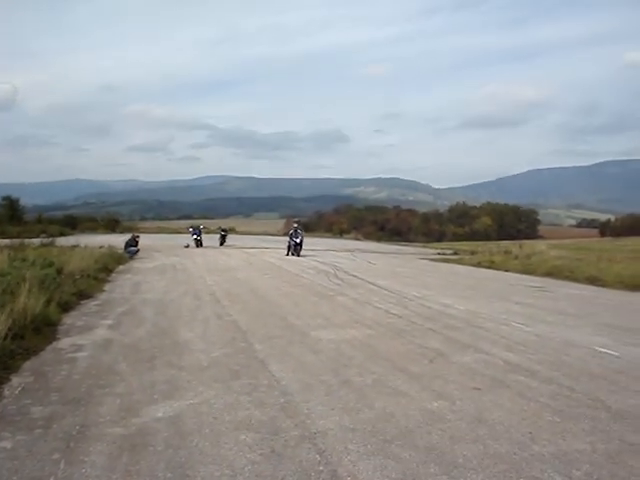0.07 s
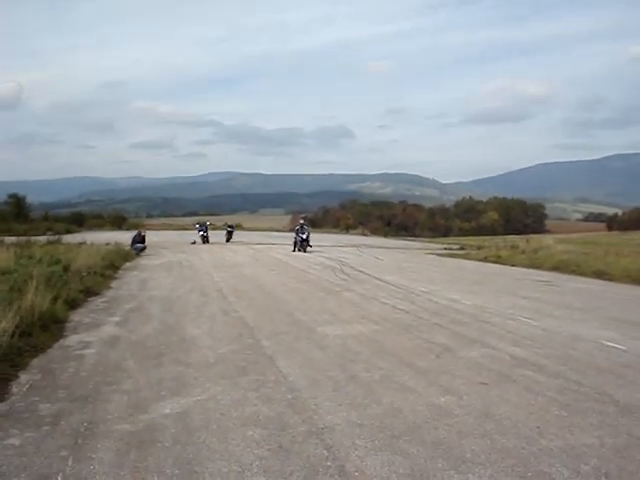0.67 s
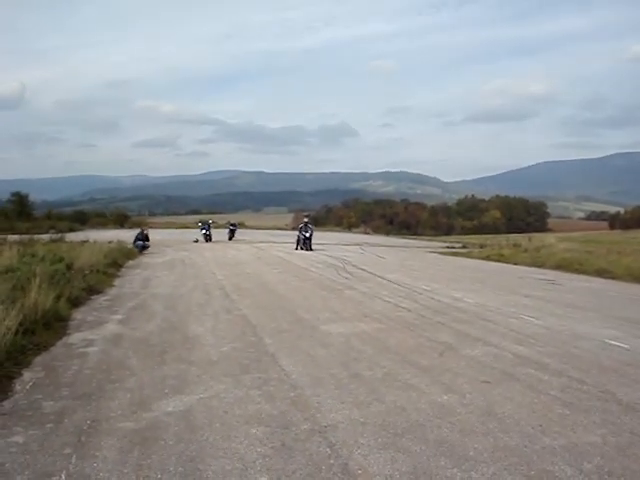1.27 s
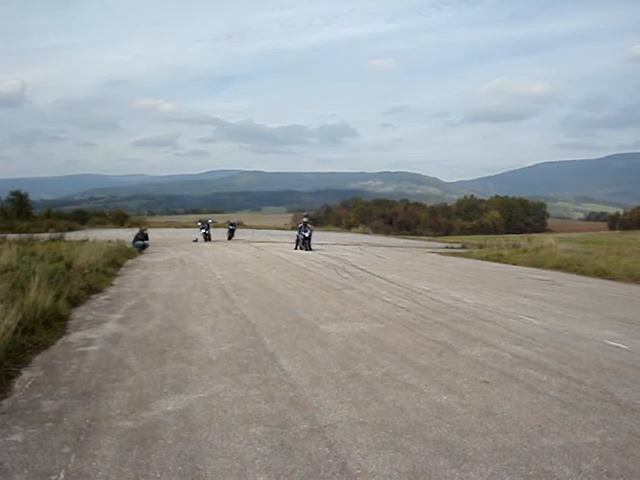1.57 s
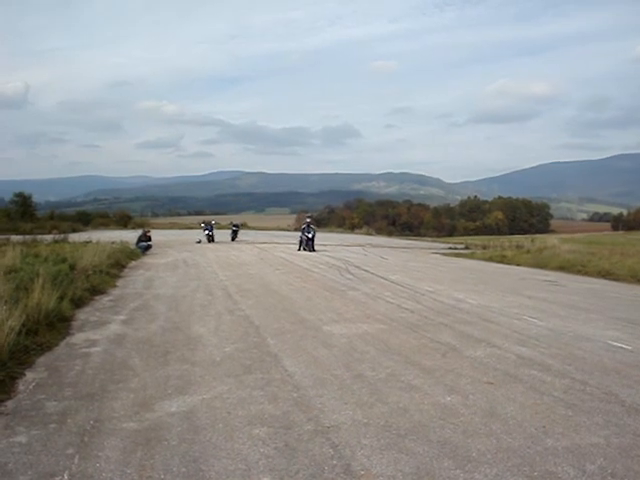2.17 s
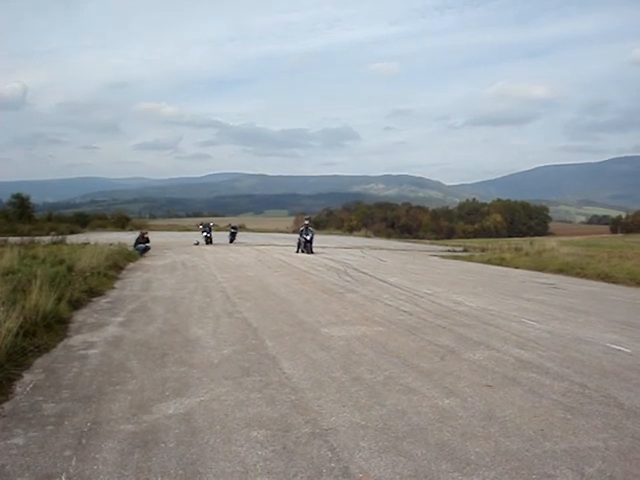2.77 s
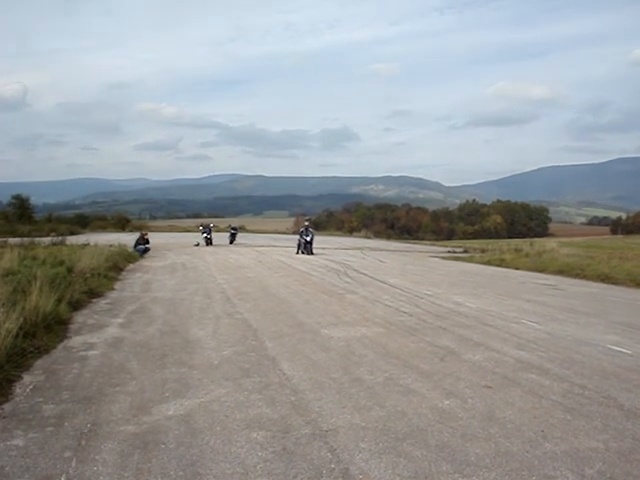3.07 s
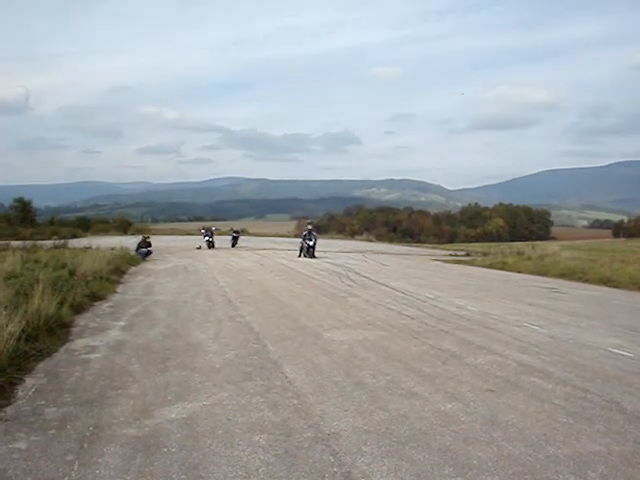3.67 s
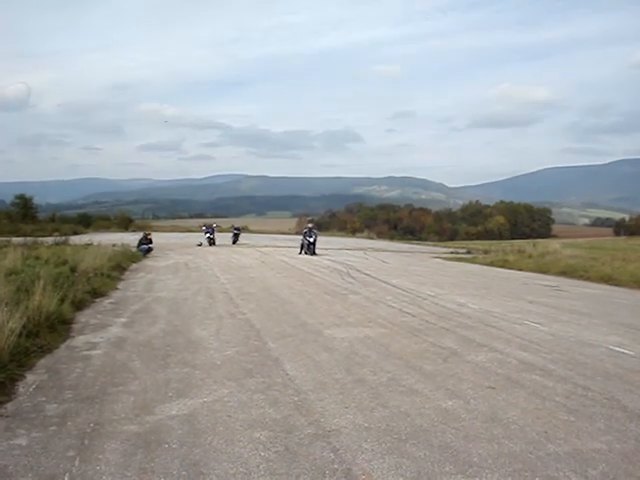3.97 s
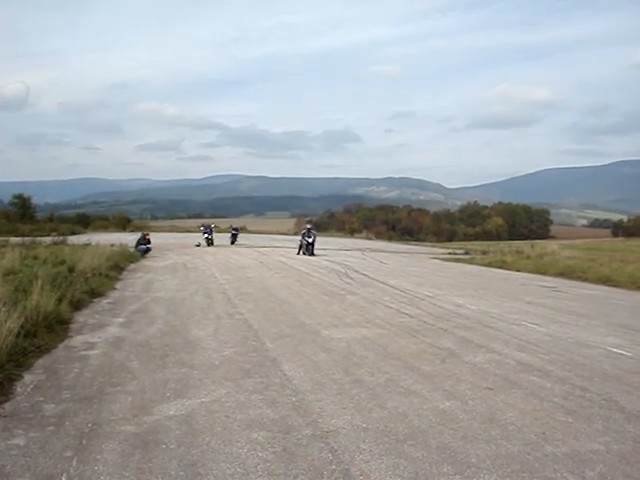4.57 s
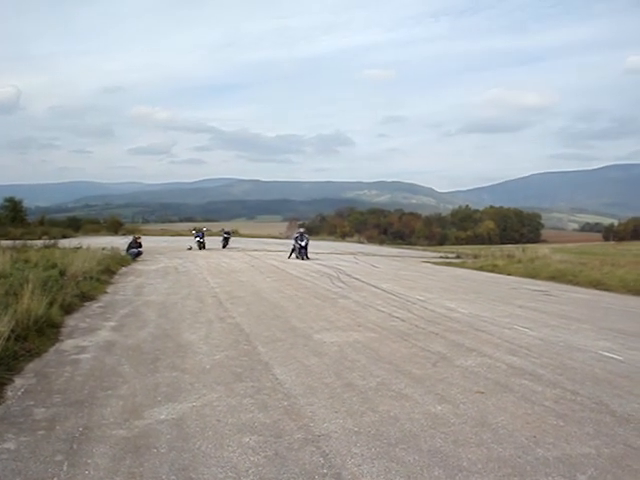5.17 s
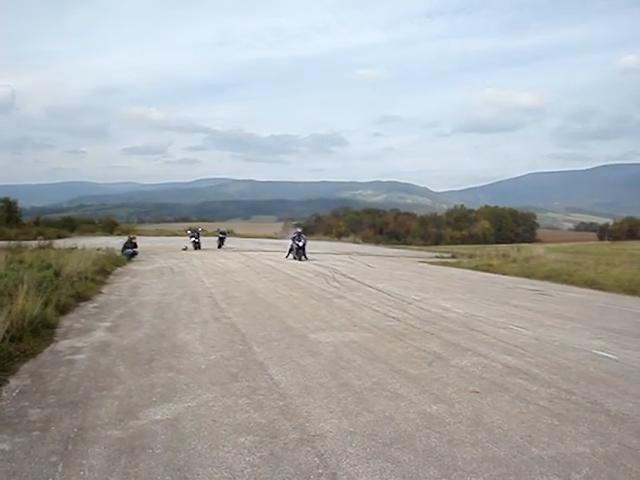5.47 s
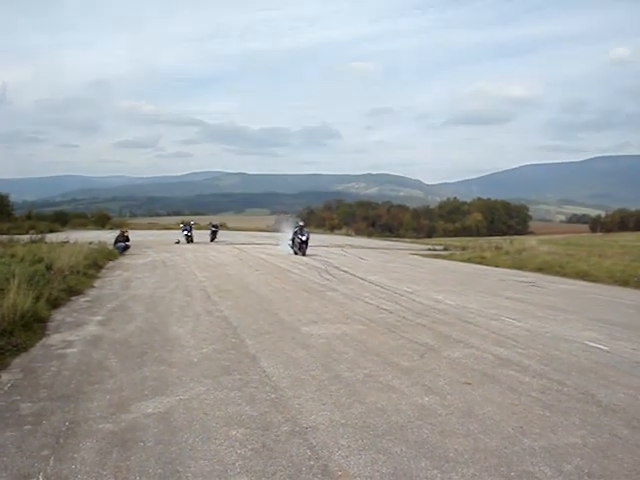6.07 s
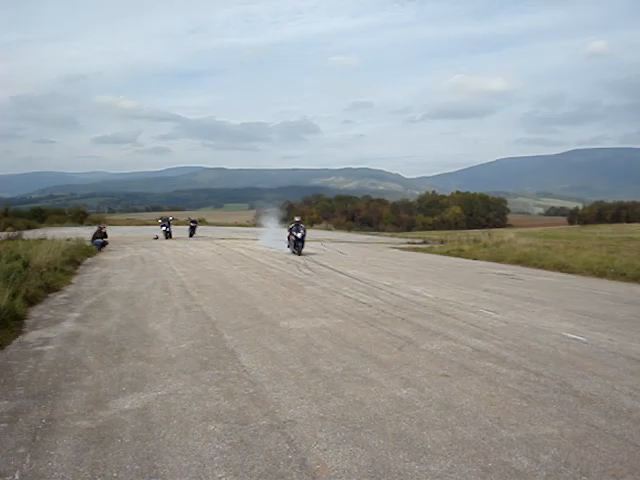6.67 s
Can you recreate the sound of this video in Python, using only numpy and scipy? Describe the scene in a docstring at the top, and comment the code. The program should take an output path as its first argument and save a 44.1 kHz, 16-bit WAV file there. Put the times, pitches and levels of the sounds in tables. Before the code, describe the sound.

A four-cylinder motorcycle idles faintly and unevenly some way down an open airstrip, with a few small rattles. It coughs, picks up speed and gives three quick, loud throttle blips. The engine then climbs to high revs and holds a raspy, wavering drone, rising again at the end. Light wind lies underneath, and a small microphone flattens the loudest peaks.

```python
"""A four-cylinder motorcycle some way down an open airstrip idles lumpily with faint rattles.
From 1.8 s it coughs and picks up, from 2.7 s it is blipped three times, and from 3.6 s it holds
high revs against its spinning rear tyre. Each firing rings the exhaust and lets out a puff of gas.
Light wind lies under it all; a small microphone flattens the loudest peaks."""
import sys
import numpy as np
from scipy import signal
from scipy.fft import rfft, irfft
from scipy.io import wavfile
from scipy.ndimage import uniform_filter1d

SR = 44100
rng = np.random.default_rng(int(sys.argv[2]) if len(sys.argv) > 2 else 0)


def waveform_to_disk(signal):
    """Save audio, clipped to [-1, 1], as 16-bit WAV at the path in sys.argv[1]."""
    frames = np.transpose(np.atleast_2d(signal))
    scaled = np.clip(frames, -1, 1) * 32767
    samples = np.round(scaled).astype(np.int16)
    wavfile.write(sys.argv[1], SR, samples)


N = 305172
T = np.arange(N) / SR

# cool silencer colour: f/Hz, level/dB
COOL_COLOUR = [(35, -59.5), (60, -14.5), (151, -15), (199, -4.5), (236, -10), (489, -7), (593, -6.5),
               (689, -1.5), (1200, -3.5), (1690, -28.5), (2190, -22.5), (2890, -51.5), (10000, -66),
               (13000, -103.5), (22000, -120)]
# cool pipe resonances: f/Hz, width/Hz, lift/dB
COOL_RESONANCES = [(211, 35, 9.5), (339, 110, 12.5), (589.5, 61, 15), (810, 110, 0.5), (1120, 570, 4),
                   (2680, 100, 0.5)]
# engine picks up, hesitates, catches: t/s, crank/Hz, level/dB
RUN_UP = [(1.8, 21.01, -39.5), (1.92, 30.67, -21.5), (2.06, 36.6, -21), (2.17, 34.44, -26.5),
          (2.3, 34.7, -22.5), (2.35, 37.06, -15), (2.47, 58.56, -7), (2.53, 63.2, -15),
          (2.66, 66.37, -14.5)]
# blips: opens/s, opening time/s, shuts/s, target crank/Hz, extra level/dB, extra rasp/dB
THROTTLE_BLIPS = [(2.67, .015, 2.77, 108, 2.5, 2), (3.025, .015, 3.115, 104, 0, 1),
                  (3.415, .05, 3.495, 89, 1, 2)]

SHUTTING_S = 0.034  # exhaust dies down after the throttle shuts
COOL_ROUGH, HOT_ROUGH, SHUT_ROUGH, LUG_ROUGH = .32, .1, .42, .2


def revving():
    """Firings and gas ring a pipe whose voice follows heat and throttle; moving air makes it waver."""
    # silencer colour, hot and throttle shut: f/Hz, level/dB
    hot_colour = [(60, -56.5), (130, -36.5), (225, 3), (350, 4), (470, 1), (620, -2.5), (1070, 1),
                  (1400, -10.5), (1700, -22), (2500, -24.5), (2850, -43.5), (4000, -43.5), (5000, -57),
                  (10000, -59.5)]
    shut_colour = [(47, -66), (80, -37), (125, -26), (183, 1), (229, -2.5), (357, -2), (428, -1.5),
                   (556, -10), (1040, -0.5), (1690, -16.5), (2200, -17), (2980, -45.5), (3870, -39),
                   (10000, -76.5), (13000, -109), (22000, -120)]
    # pipe resonances, likewise: f/Hz, width/Hz, lift/dB
    hot_modes = [(481.4, 50, 5.5), (639.5, 104, 8), (820, 30, -7.5), (920.4, 110, 7), (1078, 184, 9),
                 (1424.4, 70.4, 11), (1586, 40, 8.5), (2234, 85, 3.5), (2587, 150, 9.5), (2830, 160, -11.5),
                 (3825, 660, 7.5), (6600, 600, -1)]
    shut_modes = [(210, 110, -4.5), (414, 72, -8.5), (1090, 130, 0.5), (2635, 190, 14.5), (3100, 150, -1),
                  (4060, 530, 5.5)]
    crank_hz, opened = crank_speed(), throttle()
    heat = np.interp(T, [RUN_UP[-1][0], THROTTLE_BLIPS[0][2], 3.66, 3.84], [0, .069, .069, 1])
    shares = opened * (1 - heat), opened * heat, 1 - opened
    db, boom_db, rasp_db, gas_db, rough = engine_load(crank_hz, *shares)
    pulses = firings(crank_hz, rough)
    gas = undb(gas_db) * band(puffs(pulses, decay_s=.008), 600, 11000, order=2)
    # ragged burning at low revs
    burble = undb(2 * gas_db - 2) * band(puffs(pulses, decay_s=.012), 90, 600, order=2)
    spit = undb(-3) * band(puffs(pulses, decay_s=.0014), 3100, 11000)
    flow = pulses + gas + burble + spit
    voices = [(COOL_COLOUR, COOL_RESONANCES), (hot_colour, hot_modes), (shut_colour, shut_modes)]
    pipe = sum(share * steady(excite(flow, response(*voice))) for share, voice in zip(shares, voices))
    pipe = pipe + far_paths(pipe)
    boom = steady(band(pipe, 55, 510)) * undb(boom_db)
    bark = steady(band(pipe, 500, 1550)) * undb(.6 + .5 * wander(14))
    rasp = steady(band(pipe, 1552, 7500)) * undb(rasp_db + .69 * wander(20))
    return ramp(T, 1.76, 1.81) * undb(db) * steady(boom + bark + rasp)


def firings(crank_hz, roughness):
    """Two pulses a turn; unequal cylinders put lines between the firing harmonics."""
    # cylinders in firing order: relative strength/dB, header delay/ms; both scaled by imbalance
    cylinders = [(2.04, 0.25), (-0.4, 0.047), (0.64, .11), (0.7, 0.006)]
    fired = np.cumsum(2 * crank_hz) / SR
    count = np.arange(1, int(fired[-1]))
    t_s = np.interp(count, fired, T)
    rough = np.interp(t_s, T, roughness)
    imbalance = 1 + 1.64 * (rough - HOT_ROUGH)
    strength_db, header_ms = np.array(cylinders)[count % len(cylinders)].T * imbalance
    time_scatter, size_scatter = rng.standard_normal((len(t_s), 2)).T
    late_ms = header_ms + .13 * rough * time_scatter
    size_db = strength_db + 4 * rough * size_scatter
    return clicks(t_s + late_ms / 1000, undb(size_db))


def crank_speed(coast_hz_per_s=112):
    """Turns per second: blips wind the crank up, friction slows it, the clutch drags it into burnout."""
    # speed against the spinning tyre: t/s, crank/Hz
    burnout = [(3.54, 65), (3.58, 69.8), (3.62, 80.2), (3.68, 86.74), (3.82, 103.6), (3.91, 112.2),
               (4.01, 113.8), (4.57, 100.5), (4.81, 97.5), (4.89, 111), (4.96, 118), (5.21, 114.2),
               (5.39, 117.8), (5.75, 114.1), (6.2, 101.9), (6.47, 115), (6.7, 116.8), (6.92, 133.8)]
    points = [(t_s, hz) for t_s, hz, _ in RUN_UP]
    for opens_s, _, shuts_s, top_hz, *_ in THROTTLE_BLIPS:
        last_s, last_hz = points[-1]
        points += [(opens_s, last_hz - coast_hz_per_s * (opens_s - last_s)), (shuts_s, top_hz)]
    hz, = curves(points + list(burnout))
    return uniform_filter1d(hz, size=1500)  # flywheel inertia


def throttle(burnout_s=3.56, opening_s=.018):
    """0 shut, 1 open: open in the run-up, each blip and the burnout."""
    first_blip_s = THROTTLE_BLIPS[0][0]
    run_up = 1 - ramp(T, first_blip_s, first_blip_s + SHUTTING_S)
    burnout = ramp(T, burnout_s, burnout_s + opening_s)
    return np.minimum(run_up + blip_throttles().sum(axis=0) + burnout, 1)


def blip_throttles():
    """Throttle opening 0-1, one row per blip."""
    return np.array([ramp(T, opens_s, opens_s + opening_s) * (1 - ramp(T, shuts_s, shuts_s + SHUTTING_S))
                     for opens_s, opening_s, shuts_s, *_ in THROTTLE_BLIPS])


def engine_load(crank_hz, cool, hot, shut, reference_hz=99.6, tuned_hz=124.9, tuned_width_hz=15.4):
    """Level, boom, rasp, gas (dB) and roughness from crank speed and the shares of the pipe's voices."""
    # base exhaust mix per voice: level/dB, relative boom/dB, relative rasp/dB, gas/dB
    cool_mix = (-15, -11, -11, -7)
    hot_mix = (-14.5, -13.5, -13, -13.5)
    shut_mix = (-15, -10, -14.5, -8.5)
    db, boom_db, rasp_db, gas_db = (cool * c + hot * h + shut * s
                                    for c, h, s in zip(cool_mix, hot_mix, shut_mix))
    *_, blip_db, blip_rasp_db = np.transpose(THROTTLE_BLIPS) @ blip_throttles()
    octaves = np.log2(crank_hz / reference_hz)
    lugging = 1 - ramp(crank_hz, 31.8, 62)  # slow burning is ragged and gassy
    in_tune = hot * np.exp(-((crank_hz - tuned_hz) / tuned_width_hz) ** 2)
    pulling = hot * ramp(np.gradient(crank_hz, T), 0, 23)  # full at 23 Hz/s
    coast_db = shut * 20 * np.log2(np.maximum(crank_hz, 77.2) / reference_hz)
    _, run_up_db = curves(RUN_UP)
    db = np.where(T < RUN_UP[-1][0], run_up_db, db + coast_db + blip_db)
    boom_db = boom_db - 13 * octaves + 12.5 * in_tune  # a slow engine is mostly boom
    rasp_db = rasp_db + blip_rasp_db + 3 * in_tune + 2 * pulling
    rasp_db = rasp_db - 13 * cool * (1 - ramp(crank_hz, 74, 75))  # rasp needs speed
    gas_db = gas_db + 8.5 * lugging - 15.5 * shut * octaves  # coasting smears firings into gas noise
    rough = cool * COOL_ROUGH + hot * HOT_ROUGH + shut * SHUT_ROUGH + lugging * LUG_ROUGH
    swell_db, swell_rasp_db = swells()
    return db + swell_db, boom_db, rasp_db + swell_rasp_db, gas_db, rough


def swells():
    """The burnout twice grows louder and raspier."""
    # swells: t/s, half width/s, extra level/dB, extra rasp/dB
    bumps = [(5.88, .09, 1.5, 1), (6.32, .11, .7, 1.5)]
    t_s, width_s, db, rasp_db = np.transpose(bumps)
    shapes = np.exp(-((T[:, None] - t_s) / width_s) ** 2)
    return shapes @ db, shapes @ rasp_db


def idle(firing_hz=34.07, end_s=1.86, lope_db=.5, scatter_db=4):
    """Uneven thuds ring the pipe; weaker loping firings fill the gaps; gas knocks after each."""
    # strongest firings: t/s, relative thud/dB, relative gas knock/dB
    strong_firings = [(.02, -27.5, -27), (.12, -28, -35), (.173, -25.5, -25), (0.229, -29.5, -17),
                      (.345, -28, -19), (.404, -24.5, -26), (.545, -31, -30), (.634, -22.5, -20.5),
                      (.816, -29, -23), (0.936, -25.5, -24), (1.02, -33, -24), (1.105, -24, -26),
                      (1.223, -25.5, -21), (1.339, -31, -27), (1.52, -25.5, -17.5), (1.606, -24, -23),
                      (1.738, -33, -22)]
    # silencer colour at idle: f/Hz, level/dB
    colour = [(24, -42), (40, -17.5), (112, -17.5), (196, 0), (239, -18), (297, -16), (426, -25),
              (549, -25.5), (612, -34.5), (670, -25), (1050, -33.5), (1480, -43.5), (3000, -55),
              (3900, -94), (6600, -120)]
    # pipe resonances at idle: f/Hz, width/Hz, lift/dB
    modes = [(216, 46, 8), (300.7, 52, 13), (561, 68, 10.5), (1110, 200, 6.5)]
    t_s, thud_db, knock_db = np.transpose(strong_firings)
    gaps = [np.linspace(a, b, max(round((b - a) * firing_hz), 1), endpoint=False)[1:]
            for a, b in zip([0, *t_s], [*t_s, end_s])]
    lope = np.concatenate([-(-1) ** np.arange(len(gap)) for gap in gaps])  # weak, strong in turn
    filler_db = lope_db * lope + scatter_db * rng.standard_normal(len(lope))
    fillers = clicks(np.concatenate(gaps), undb(filler_db))
    thuds = clicks(t_s, undb(thud_db)) + undb(-31.5) * fillers
    knocks = clicks(t_s, undb(knock_db)) + undb(-28.5) * fillers
    gas = undb(3) * band(puffs(knocks, decay_s=.023), 515, 5000)
    burble = undb(-4) * puffs(thuds, decay_s=.025)
    return excite(thuds + gas + burble, response(colour, modes))


def coughs():
    """Single hard firings ring the cool pipe as the throttle opens."""
    # hard firings: t/s, relative level/dB
    hard_firings = [(1.899, -21), (1.918, -7), (1.933, -2.5), (1.982, -17), (2, -6.5), (2.013, -17),
                    (2.155, -29), (2.227, -12)]
    t_s, db = np.transpose(hard_firings)
    pulses = clicks(t_s, undb(db - 5))
    gas = undb(-3) * puffs(pulses, decay_s=.005)
    pipe = excite(pulses + gas, response(COOL_COLOUR, COOL_RESONANCES))
    return band(pipe, 70, 1600, order=2)


def rattles():
    """Faint bright chatter over the idle."""
    # rattles: t/s, relative level/dB
    hits = [(0.2004, -42), (0.3451, -45), (0.4314, -42), (0.4464, -46), (0.632, -46)]
    t_s, db = np.transpose(hits)
    pulses = clicks(t_s, undb(db + 29.5))
    return band(puffs(pulses, decay_s=.0083), 1700, 2500, order=2)


def far_paths(x, db=-14, count=4):
    """Weak late arrivals fade in and out with the wind, so each harmonic wavers on its own."""
    lags = rng.integers(SR // 200, SR // 25, count)
    arrivals = sum(wander(3.172) * np.pad(x, (lag, 0))[:N] for lag in lags)
    return undb(db) * arrivals / np.sqrt(count)


def wind():
    """Light wind: a gusting rumble under a smooth hiss."""
    # wind colour: f/Hz, level/dB
    colour = [(15, -69), (25, -19.5), (110, -30.5), (200, -7), (257, -2.5), (314, -5.5), (447, -6),
              (546, -14.5), (1070, -14), (1730, -36.5), (10000, -49), (13000, -94), (22000, -120)]
    noise = set_rms(excite(rng.standard_normal(N), response(colour)), -34.5)
    gusts = undb(2.5 * wander(5))
    rumble = undb(-3.5) * band(noise, 20, 91) + undb(-11.5) * band(noise, 190, 1300)
    hiss = undb(.53) * band(noise, 1500, 10480)
    return gusts * rumble + hiss


def response(colour, modes=(), size=8192):
    """Minimum-phase ring of a body with this colour and these resonances; peak 1."""
    f_hz = np.arange(size // 2 + 1) * SR / size
    hz, db = np.transpose(colour)
    gain_db = np.interp(np.log(f_hz + 1), np.log(hz), db)
    for centre_hz, width_hz, lift_db in modes:
        gain_db = gain_db + lift_db / (1 + (2 * (f_hz - centre_hz) / width_hz) ** 2)
    cepstrum = irfft(np.log(undb(gain_db)))
    cepstrum[1:size // 2] *= 2
    cepstrum[size // 2 + 1:] = 0
    ring = irfft(np.exp(rfft(cepstrum)))
    return ring / np.abs(ring).max()


def excite(x, ring):
    """Convolve a signal with a ring."""
    return signal.fftconvolve(x, ring)[:N]


def clicks(t_s, sizes):
    """Impulses, each shared between its two nearest samples."""
    at = np.clip(np.asarray(t_s) * SR, 0, N - 2)
    i = at.astype(int)
    return np.bincount(i, sizes * (1 - at + i), N) + np.bincount(i + 1, sizes * (at - i), N)


def puffs(pulses, decay_s):
    """A fading burst of turbulence after each pulse, with the pulse's energy."""
    fade = np.exp(-T[:SR // 10] / decay_s)
    return excite(pulses, fade / np.linalg.norm(fade)) * rng.standard_normal(N)


def band(x, lo_hz, hi_hz, order=4):
    """Zero-phase band-pass."""
    return signal.sosfiltfilt(signal.butter(order, [lo_hz, hi_hz], "band", fs=SR, output="sos"), x)


def steady(x, size=3000):
    """Unit running rms; single firings keep their differences."""
    power = uniform_filter1d(uniform_filter1d(x * x, size), size)
    return x / np.sqrt(np.maximum(power, 0) + 1e-5 * np.mean(x * x))


def wander(rate_hz):
    """Random steps, smoothed twice; spread 1."""
    hold = int(SR / rate_hz)
    steps = np.repeat(rng.standard_normal(1024), hold)[:N]
    return set_rms(uniform_filter1d(uniform_filter1d(steps, hold), hold), 0)


def curves(table):
    """Table columns, linearly interpolated over time."""
    t_s, *columns = np.transpose(table)
    return [np.interp(T, t_s, column) for column in columns]


def ramp(x, start, end):
    """Linear 0 to 1 from start to end, held outside."""
    return np.clip((x - start) / (end - start), 0, 1)


def set_rms(x, db):
    """Scale to an rms level."""
    return x * undb(db) / np.std(x)


def undb(db):
    """Decibels to gain."""
    return 10 ** (np.asarray(db) / 20)


def scene():
    """The motorcycle in the open air; mono."""
    return (idle() + revving() + coughs() + rattles() + wind())[None]


def record(dry, crest=.48, knee=6, overload=.74, thump_gain=1.9, thump_hz=160, top_hz=10100):
    """The signal is turned over; the microphone amplifier rounds crests and clips troughs; filters cut offset
    and top."""
    swing = -dry
    rounded = swing / (1 + (np.maximum(swing, 0) / crest) ** knee) ** (1 / knee)
    # each overload shifts the bias, which settles with a soft thump
    excess = swing - np.clip(swing, -overload, overload)
    bias = thump_gain * signal.sosfilt(signal.butter(1, thump_hz, fs=SR, output="sos"), excess)
    clipped = np.maximum(rounded - bias, -overload)
    centred = signal.sosfilt(signal.butter(1, 30, "high", fs=SR, output="sos"), clipped)
    return signal.sosfilt(signal.ellip(10, .2, 70, top_hz, fs=SR, output="sos"), centred)


dry = scene()
out = record(dry)
waveform_to_disk(out)
```